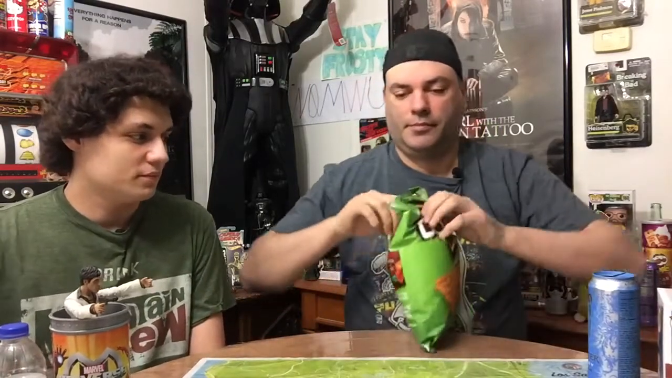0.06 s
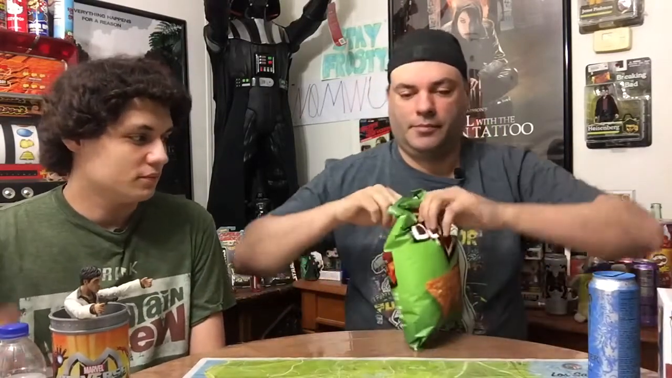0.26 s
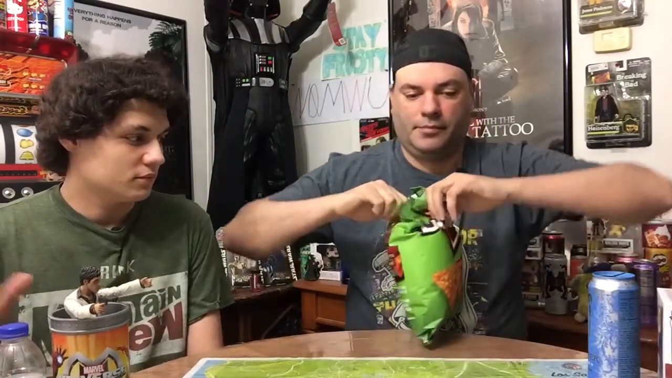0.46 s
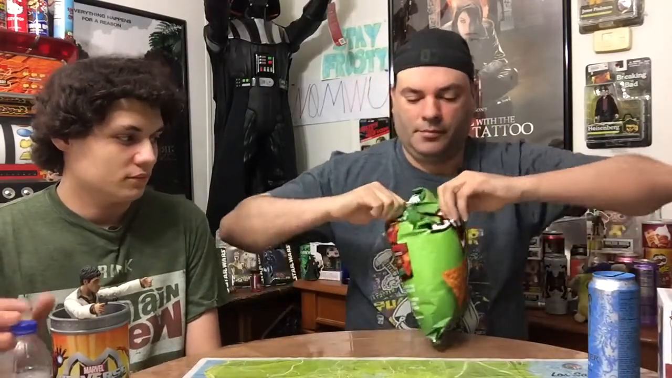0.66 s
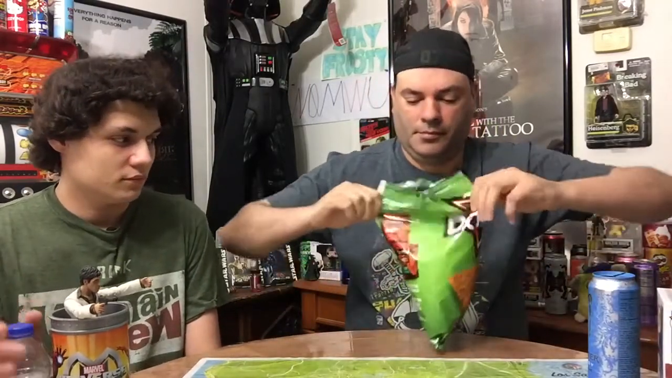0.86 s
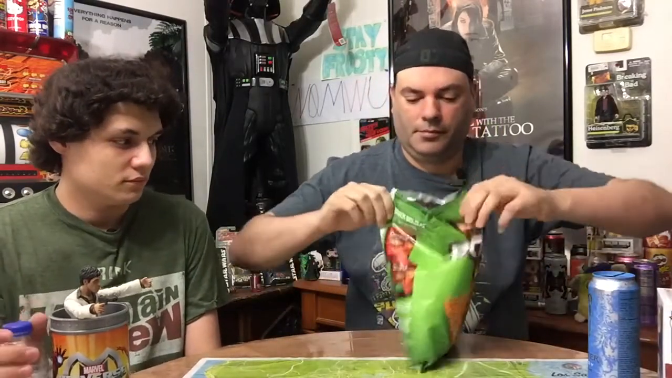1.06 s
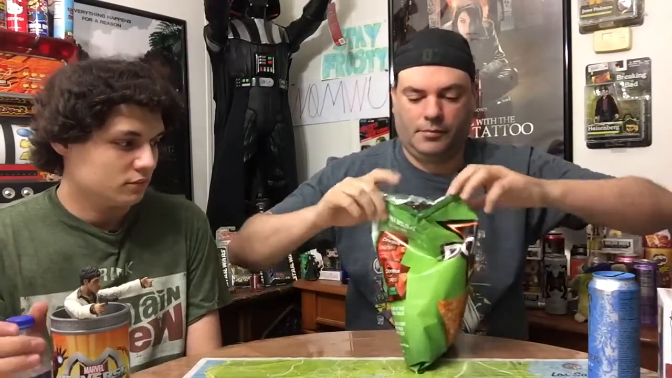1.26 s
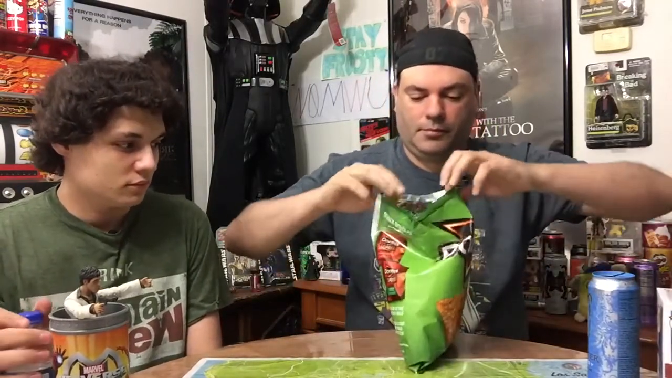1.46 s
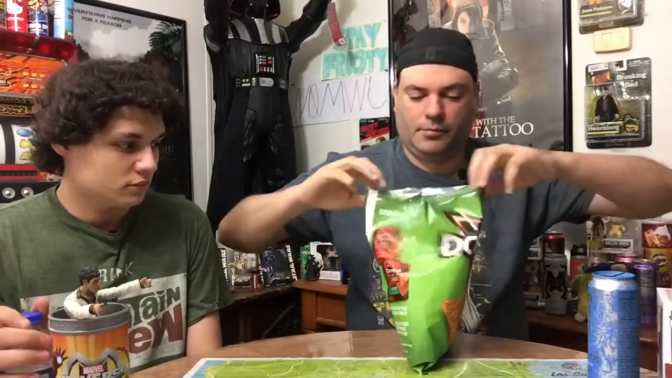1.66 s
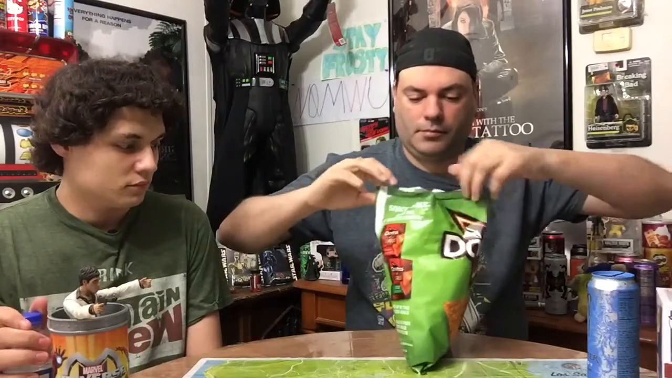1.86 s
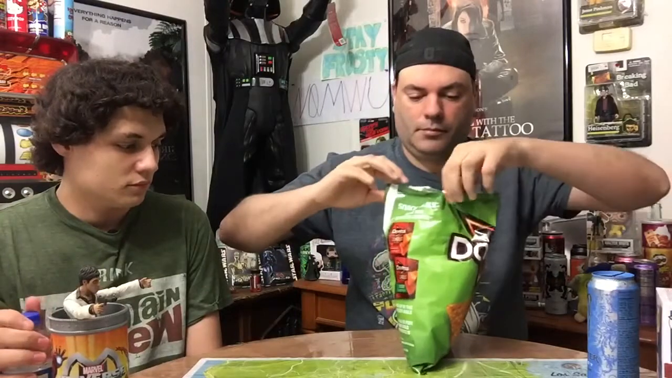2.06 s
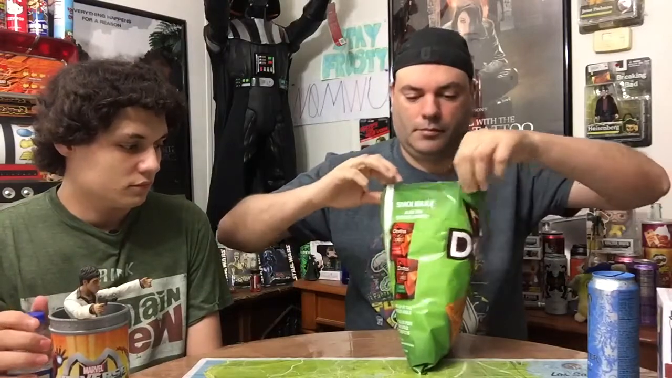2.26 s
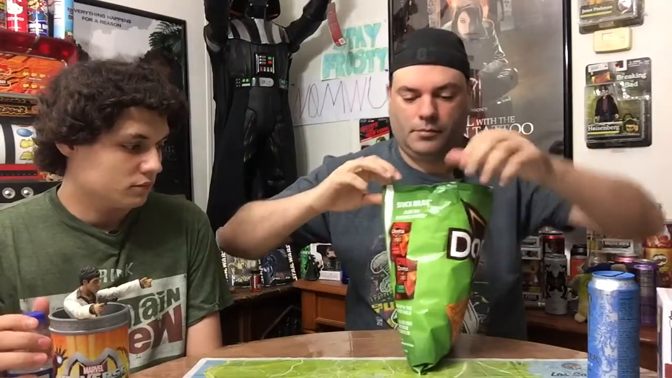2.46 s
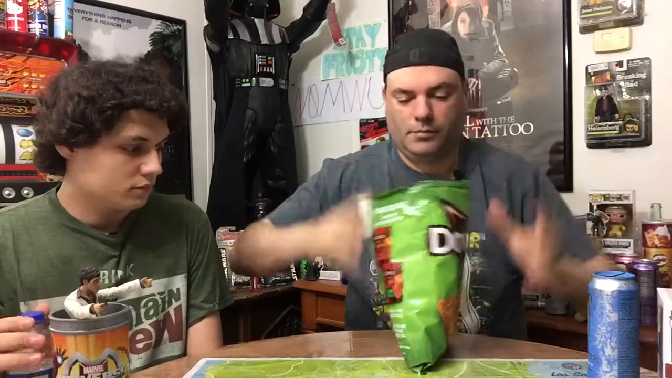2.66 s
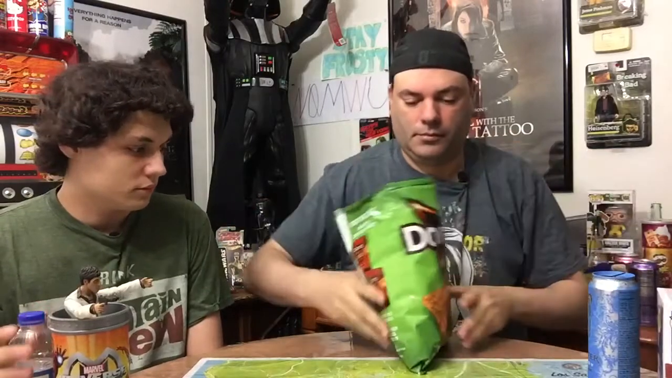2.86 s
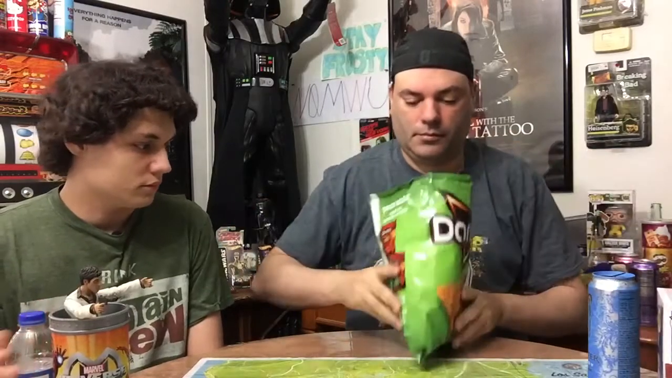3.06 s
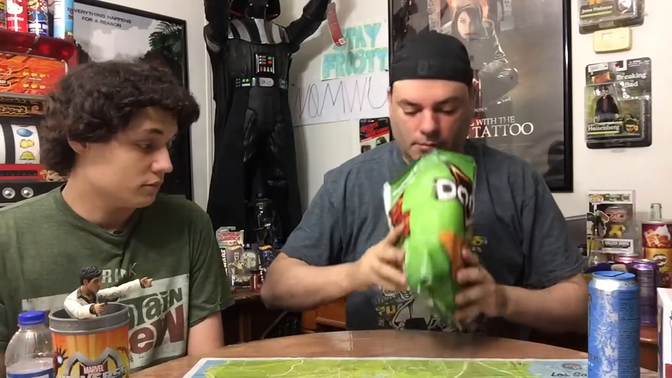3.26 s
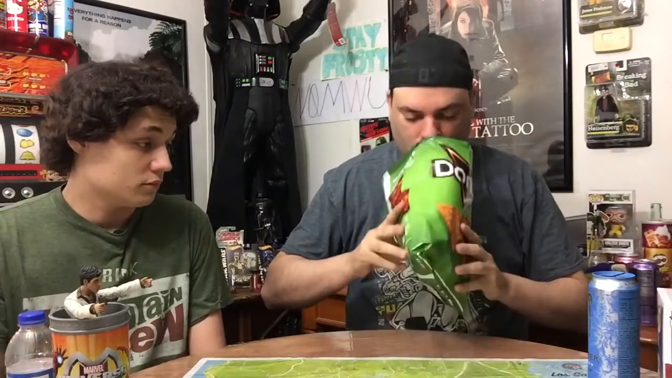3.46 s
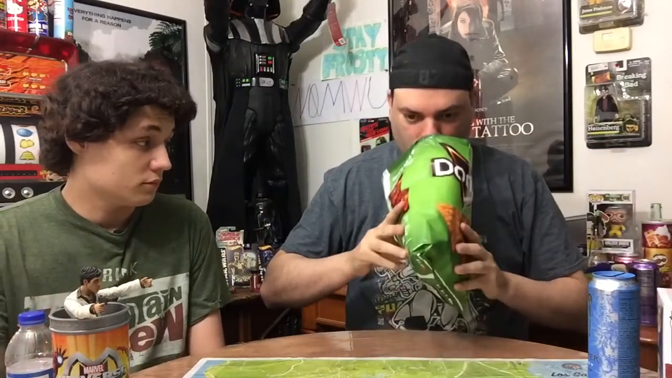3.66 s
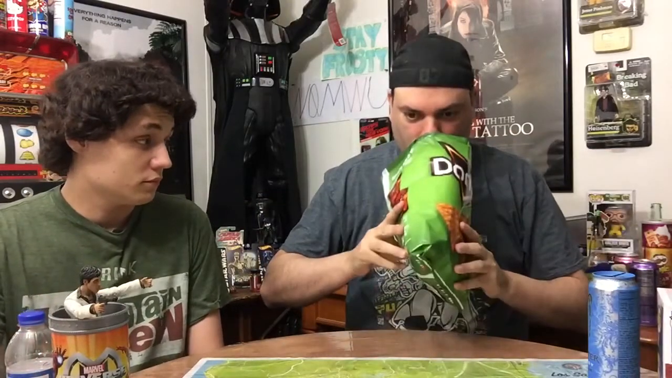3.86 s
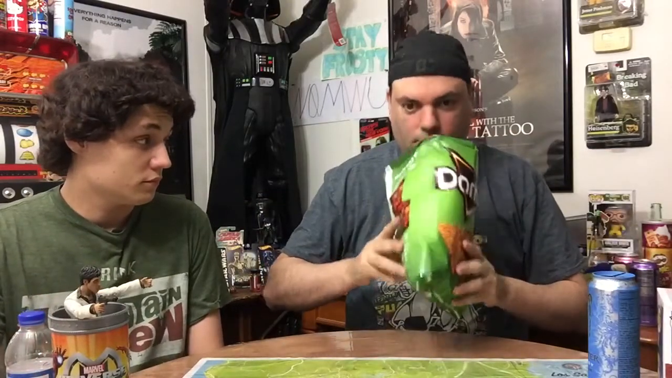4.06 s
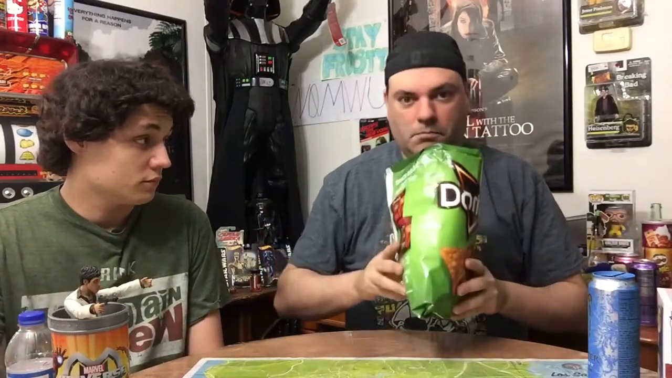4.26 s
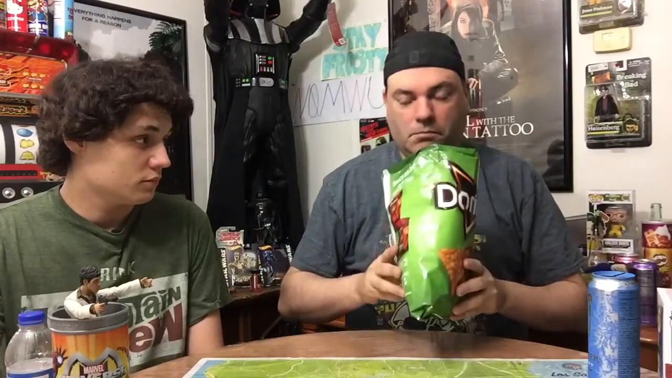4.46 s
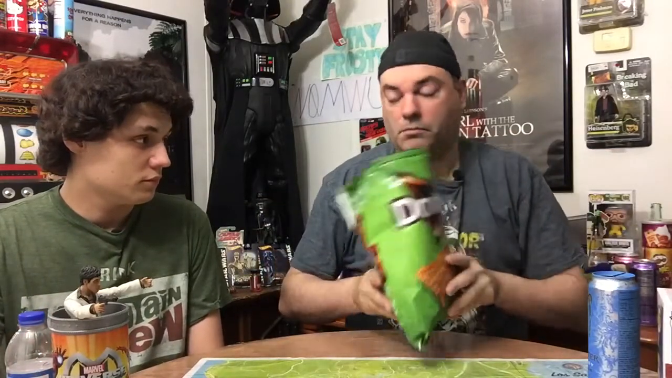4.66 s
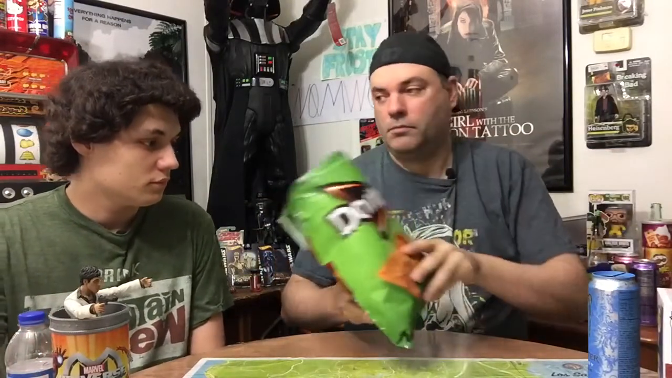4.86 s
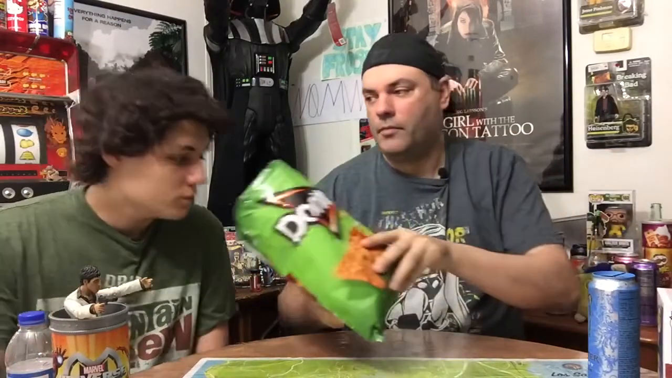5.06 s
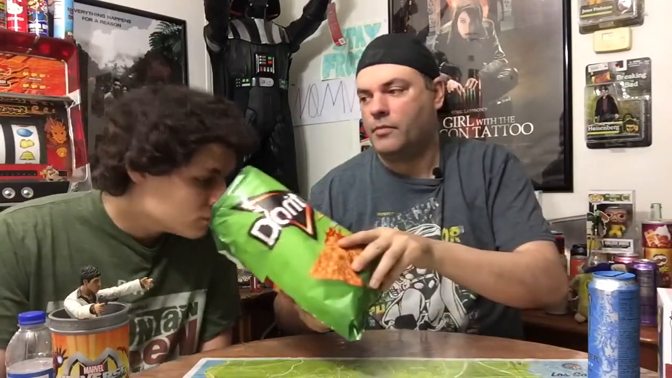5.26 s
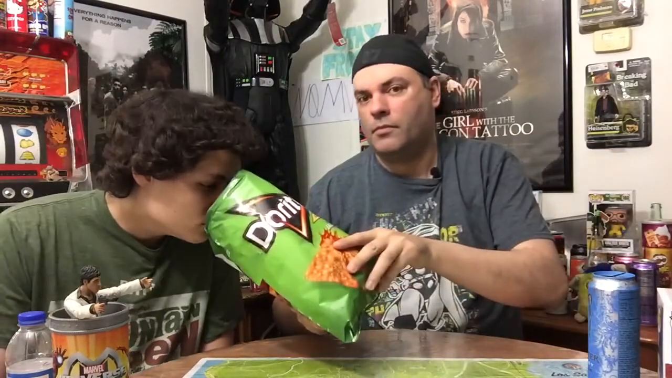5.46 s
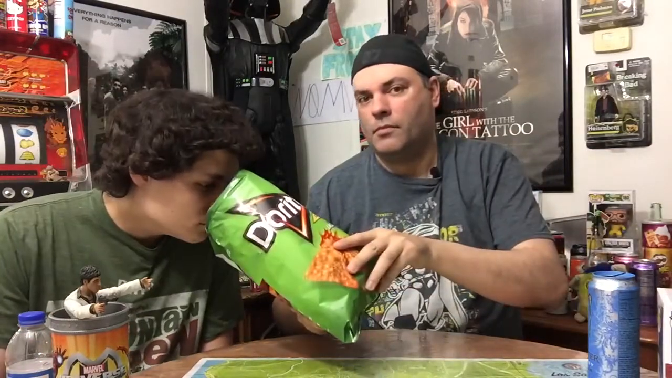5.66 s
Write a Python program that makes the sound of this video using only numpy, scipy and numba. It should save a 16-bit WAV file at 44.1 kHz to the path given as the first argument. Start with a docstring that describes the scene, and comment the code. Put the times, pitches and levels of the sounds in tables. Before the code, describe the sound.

Bright, snappy foil packet crackling with a brief seal rip near the start, dying to occasional soft ticks in a small quiet room.

```python
"""A foil snack bag is pulled open and handled at a table, a metre or two from the microphone.
Creases buckle in a random crackle that follows the squeezes; louder ones also ring a flat panel of the bag.
The glued seal gives two tugs and tears, as noisy stick-slip pulses through broad resonances.
The small furnished room adds one early reflection and a faint tail. Behind it two motors hum and beat,
a low throb comes and goes, drones waver, and a thin whine sits over the steady room hiss."""
import sys
import numpy as np
from scipy import signal
from scipy.fft import rfft, irfft
from scipy.io import wavfile
from numba import njit

SR = 44100
rng = np.random.default_rng(int(sys.argv[2]) if len(sys.argv) > 2 else 0)


def wav_out(sig):
    """Save sig, one row per channel (or a flat mono array), as 16-bit PCM at SR to the path in sys.argv[1]."""
    wavfile.write(sys.argv[1], SR, np.round(np.clip(np.atleast_2d(sig).T, -1, 1) * 32767).astype(np.int16))


N = 252328  # length [samples]

# squeezes of the bag: (grip reached [s], held [s], crackle level [dB], let-go rate [dB/s])
SQUEEZES = [(0, 0.036, -35, 71), (0.202, .17, -40.5, 124), (.505, 0.21, -37, 82), (.68, 0.12, -40, 298.5),
            (0.812, 0.095, -27.5, 300), (0.986, 0.0053, -32, 111), (1.175, 0.02, -27, 698),
            (1.3, 0.0084, -41.5, 550), (1.433, 0.26, -49, 300), (1.657, 0.14, -34.5, 129),
            (2.209, 0.011, -40.5, 699), (2.292, 0.082, -37, 255), (2.421, 0.069, -48.5, 800),
            (2.62, 0.051, -60, 650.5), (2.813, 0.0048, -40.5, 408), (2.875, 0.035, -37.5, 211),
            (3.038, 0.03, -40, 350), (3.141, 0.014, -48.5, 301), (3.208, 0.09, -50, 221),
            (4.173, 0.015, -47, 256.5), (4.642, 0.047, -54, 102), (4.862, 0.059, -54.5, 208),
            (5.044, 0.015, -53.5, 502)]
# how the grip colours the crackle: (time [s], bag boom [dB], sizzle [dB])
GRIP_COLOUR = [(0, -2.5, -17.5), (.6, -5, -6.5), (1.501, -7.5, -10), (2.302, -2.5, -3.5), (3.003, 0.5, -15),
               (4.201, -3.5, -27), (4.698, 5, -20), (4.851, -3.5, -2.5), (5.101, 8.5, -22)]
# single loud creases: (time [s], snap level [dB], panel pitch [Hz], sizzle [dB])
LOUD_SNAPS = [(.0117, -36, 3200, -30), (.0352, -24, 6500, -8), (.052, -8.5, 627, -28),
              (.0793, -16.5, 3330, -16), (.129, -26.5, 400, 0), (.2768, -23, 2540, -20),
              (.2958, -24, 2250, -3), (.3372, -8.5, 3300, -15.5), (.4283, -16, 1900, -16.5),
              (.449, -23.5, 493, -12), (.5381, -20, 2740, -31), (.5833, -18.5, 3170, -18),
              (.604, -24, 4700, -11), (.6135, -8, 2330, -22), (.623, -14.5, 2270, -12),
              (.6392, -11.5, 3570, -28), (.6906, -22, 3570, 0), (.8512, -13, 2640, -24),
              (.862, -31, 2510, -30), (.8704, -7, 3200, -30), (.895, -12.5, 1060, 3),
              (.919, -15.5, 400, -11), (.9742, -26.5, 3180, 4.5), (1.061, -21.5, 3150, -33.5),
              (1.1863, -18, 1330, -18), (1.3928, -26.5, 2730, -25), (1.4282, -33, 2750, 3.5),
              (1.4565, -24, 2260, -15), (1.5232, -32.5, 2500, 6.5), (1.6318, -23, 3300, -11),
              (1.6606, -14, 2200, -8.5), (1.7285, -17, 3630, -16.5), (1.7682, -10, 2480, -13),
              (1.7919, -10, 910, -3), (1.8, -5.5, 2550, -18), (2.011, -33.5, 2250, -8),
              (2.148, -42.5, 1800, -29), (2.2042, -24, 2410, -24), (2.2875, -16.5, 1930, -3),
              (2.3025, -19, 2000, -20), (2.346, -18, 2430, -22), (2.3565, -29, 2200, -17),
              (2.363, -7.5, 2150, -25.5), (2.3872, -14.5, 840, -36), (2.3945, -13.5, 3080, -22),
              (2.468, -17.5, 2600, -41), (2.5136, -30, 816, -1), (2.5686, -26.5, 2520, -33),
              (2.6195, -34.5, 2940, -6), (2.7869, -31, 613, -26), (2.817, -18, 2920, -17),
              (2.8726, -31.5, 580, 13), (2.9108, -37, 288, -15), (2.947, -21, 3550, -31),
              (3.056, -28, 620, -5), (3.083, -19, 1360, -32), (3.165, -37.5, 1147, -7),
              (3.239, -36.5, 480, 4), (3.2844, -38.5, 570, 1), (3.486, -45.5, 1840, -34),
              (3.75, -26, 733, 1.5), (3.8563, -32.5, 2690, -12.5), (3.8736, -42.5, 1450, -4),
              (3.9976, -30, 696, -43.5), (4.1663, -35, 1976, -35.5), (4.1954, -33, 669, -9.5),
              (4.3226, -32, 1147, -15.5), (4.5516, -36.5, 1090, -27), (4.6615, -30.5, 794, -38),
              (4.702, -32, 796, -38), (4.7572, -29, 1400, -6.5), (4.778, -25.5, 6100, -22),
              (4.7917, -27.5, 2640, 1.5), (4.8746, -28, 1300, -20), (4.9152, -25, 606, -7.5),
              (4.917, -38, 229, -26), (5.0485, -39.5, 673, -26), (5.063, -36.5, 704, -33.5),
              (5.249, -52, 1287, -28.5)]
# colour of a crease, before grip and patch: (frequency [Hz], relative level [dB])
FOIL_MODES = [(172, -18.5), (318, -10.5), (452, -7.5), (709, 1), (1110, 3), (1760, -0.5), (2545, 1),
              (3700, 1), (5550, 2.5), (7550, 2.5), (10800, 1.5), (13600, 4)]
# the seal, two tugs and the tear: (start [s], end [s], start level [dB], end level [dB], slip rate [1/s])
SEAL_TEARS = [(0.721, 0.761, -30, -27, 430), (.776, 0.785, -23.5, -27, 1100),
              (0.801, 0.809, -15, -10.5, 2500)]
# resonances of the tearing seal: (centre [Hz], width [Hz], relative level [dB])
RIP_BANDS = [(3140, 670, -0.5), (5900, 2300, 4.5), (9000, 1900, -2.5), (12330, 12000, 3)]
# diffuse tail at the microphone: (centre [Hz], 60 dB decay [s], level against the direct sound [dB])
ROOM_TAIL = [(300, .25, -22), (1200, .2, -21), (4000, .25, -17), (11000, .18, -17)]
# two motors almost in tune: (frequency [Hz], rms level [dB])
MOTORS = [(58.85, -67), (59.52, -70)]
# low tone that comes and goes: (time [s], rms level [dB])
THROB_LEVEL = [(0, -64), (1.2, -66.5), (1.6, -79.5), (5.1, -70), (5.38, -63), (5.72, -67.5)]
# wavering drones: (centre [Hz], width [Hz], rms level [dB])
DRONES = [(114, 12, -79), (420, 60, -83)]
# spectrum of the room hiss: (frequency [Hz], relative level per hertz [dB])
HISS_SPECTRUM = [(82, -25.5), (140, -4.5), (297, -4.5), (408, 0), (488, -9), (2630, -11.5), (16000, -23.5)]

CRACKS_PER_S = 1200
SQUEEZE_DB_PER_S = 901  # how fast the crackle builds as the fingers close
SETTLE_DB = -82  # the bag creeps faintly between squeezes
BOOM_BELOW_HZ, SIZZLE_ABOVE_HZ = 3610, 1990  # boom and sizzle act more with octaves beyond these, to a limit
PANEL_DB, PANEL_SHARE = 2, 0.83  # panel ring over a -25 dB snap; it grows by this share of each further dB
CREASE_DB = -5.5  # the broad snap under the panel ring
BOOM_DB, BOOM_DB_PER_OCTAVE = -12.5, 2  # bag boom of a 1 kHz panel; larger, lower panels boom more
TEAR_RISE_DB_PER_S, TEAR_FALL_DB_PER_S = 1800.5, 4999.5
WALL_S, WALL_DB = 0.0074, -16.5  # delay and level of one early reflection
IN_STEP_S = .7  # moment at which both motors push together
THROB_HZ = 77
WHINE_HZ, WHINE_DB = 3970, -79
HISS_DB = -71.5  # rms
TOP_HZ = 15900  # upper limit of the recorder


def crackle():
    """A random rain of small creases, mostly faint, a few strong, on patches of every size."""
    when, size, patch = rng.random((int(CRACKS_PER_S * N / SR), 3)).T
    when = when * N / SR
    # the crackle comes in loose clumps, swelling and thinning at random
    clumps = level(band(rng.standard_normal(N), 40, 60), 0)
    size_db = np.minimum(-3.5 * np.log(1 - size), 11)
    size_db = size_db + 2 * clumps[(when * SR).astype(int)]

    grip_s, grip_boom_db, grip_sizzle_db = np.transpose(GRIP_COLOUR)
    boom_db = np.interp(when, grip_s, grip_boom_db)
    sizzle_db = np.interp(when, grip_s, grip_sizzle_db)
    patch_hz = 160 * 2 ** (6.4 * patch)
    crack_db = handling_db(when) + size_db
    return creases(when, crack_db, boom_db, sizzle_db, patch_hz, focus_db=7, smear_cycles=16.0)


def handling_db(t):
    """Crackle level: every squeeze builds, holds and dies away; they add in power."""
    reached, held, db, fall = np.transpose(SQUEEZES)[:, :, None]
    building = SQUEEZE_DB_PER_S * np.maximum(reached - t, 0)
    letting_go = fall * np.maximum(t - reached - held, 0)
    squeeze_power = undb(2 * (db - building - letting_go))
    return 10 * np.log10(np.sum(squeeze_power, axis=0) + undb(2 * SETTLE_DB))


def snaps(count=3):
    """Each loud crease rings the flat panel beside it, among weaker buckles a few milliseconds after."""
    s, db, panel_hz, sizzle_db = np.repeat(LOUD_SNAPS, count, axis=0).T
    late, faint, tune = rng.random((len(s), 3)).T
    follower = np.arange(len(s)) % count > 0
    panel_db = PANEL_DB - (1 - PANEL_SHARE) * (db + 25)
    boom_db = BOOM_DB - BOOM_DB_PER_OCTAVE * np.log2(panel_hz / 1000)
    s = s + follower * (0.011 * late + .001)
    db = db - follower * (11 + 8 * faint)

    start = (s * SR).astype(np.int64)
    ring_hz = panel_hz * 0.95 ** (follower * (tune - .5))
    cycles = 5 * np.minimum(panel_hz / 1000, 1) ** .4  # big low panels ring for fewer cycles
    panel = ring(N, start, ring_hz, cycles, undb(db + panel_db), 1. * SR)
    return panel + creases(s, db + CREASE_DB, boom_db, sizzle_db, panel_hz, focus_db=0.5, smear_cycles=5.0)


def creases(s, db, boom_db, sizzle_db, patch_hz, focus_db, smear_cycles):
    """Every crease rings detuned short modes, strongest near its patch pitch (focus_db: loss per octave off)."""
    hz, foil_db = np.repeat(FOIL_MODES, 2, axis=0).T  # a pair of modes for each row
    cycles = np.clip(hz / 192.0, 5, 24)
    boom = np.clip(.4 * np.log2(BOOM_BELOW_HZ / hz), 0, .7)
    sizzle = np.clip(0.35 * np.log2(hz / SIZZLE_ABOVE_HZ), .1, 1)
    tune, sign, late, loud = rng.random((len(s), len(hz), 4)).transpose(2, 0, 1)
    pitch = np.minimum(hz * 1.471 ** (tune - .5), .4 * SR)

    octaves_off = np.abs(np.log2(pitch / patch_hz[:, None]))
    mode_db = db[:, None] + foil_db + boom * boom_db[:, None] + sizzle * sizzle_db[:, None]
    mode_db = mode_db + 3.0 * (2 * loud - 1) - focus_db * octaves_off
    size = undb(mode_db) * np.sign(sign - .5)
    # modes start at scattered moments, the highest treble soonest
    delay = late * np.minimum(smear_cycles / pitch, .0015)
    start = ((s[:, None] + delay) * SR).astype(np.int64)
    cycles = np.broadcast_to(cycles, pitch.shape)
    rung = ring(N, start.ravel(), pitch.ravel(), cycles.ravel(), size.ravel(), 1. * SR)
    # a light sheet cannot radiate deep bass
    return signal.sosfilt(signal.butter(4, 110, "high", fs=SR, output="sos"), rung)


@njit
def ring(count, start, hz, cycles, size, sr):
    """Damped sines that swell over their first cycle and fall 60 dB in twice their number of cycles."""
    out = np.zeros(count)
    for k in range(len(start)):
        length = int(2 * cycles[k] * sr / hz[k])
        turn = np.exp(2j * np.pi * hz[k] / sr - np.log(1000.) / length)
        z = size[k] + 0j
        unborn = 1.
        rise = np.exp(-2 * hz[k] / sr)
        for i in range(start[k], min(start[k] + length, count)):
            out[i] += z.imag * (1 - unborn)
            z *= turn
            unborn *= rise
    return out


def rip():
    """The glued seam peels in stick-slip jerks, a buzz when slow and a rough hiss when fast."""
    t = np.arange(N) / SR
    out = 0
    for t0, t1, db0, db1, rate in SEAL_TEARS:
        # one jerk of random size each time the unsteady phase passes a whole number
        phase = rate * t + .1 * level(band(rng.standard_normal(N), rate / 4, rate / 2), 0)
        jerks = (np.diff(np.floor(phase), prepend=0) > 0) * (.5 + rng.random(N))
        slips = jerks + 0.082 * rng.standard_normal(N)
        hiss = sum(level(band(band(slips, hz, w), hz, w), db) for hz, w, db in RIP_BANDS)
        before_db = TEAR_RISE_DB_PER_S * np.maximum(t0 - t, 0)
        after_db = TEAR_FALL_DB_PER_S * np.maximum(t - t1, 0)
        tear_db = np.interp(t, (t0, t1), (db0, db1)) - (before_db + after_db)
        out = out + level(hiss, 0) * undb(tear_db)
    return out


def room(x):
    """One early reflection and a faint diffuse tail that dies sooner in the upper treble."""
    t = np.arange(SR // 2) / SR
    response = 0
    for hz, t60, db in ROOM_TAIL:
        decay = 1000. ** (-t / t60)
        build = np.minimum(t / .006, 1)
        part = band(rng.standard_normal(len(t)), hz, hz * 1.5) * decay * build
        response = response + undb(db) * part / np.sqrt(np.sum(part ** 2))
    response[0] = 1  # direct sound
    response[int(WALL_S * SR)] += undb(WALL_DB)
    return signal.fftconvolve(x, response)[:N]


def background():
    """Two motors almost in tune swell and cancel; a throb, wavering drones, a thin whine and a steady hiss."""
    t = np.arange(N) / SR
    hum = sum(np.sqrt(2) * undb(db) * np.sin(2 * np.pi * hz * (t - IN_STEP_S)) for hz, db in MOTORS)
    throb_db = np.interp(t, *np.transpose(THROB_LEVEL))
    throb = np.sqrt(2) * undb(throb_db) * np.sin(2 * np.pi * THROB_HZ * t)
    drones = sum(level(band(band(rng.standard_normal(N), hz, w), hz, w), db) for hz, w, db in DRONES)
    drift = level(band(rng.standard_normal(N), 7.3, 9.1), 0)
    whine_hz = WHINE_HZ + 12 * drift
    whine = np.sqrt(2) * undb(WHINE_DB) * np.sin(2 * np.pi * np.cumsum(whine_hz) / SR)
    hiss = level(coloured(HISS_SPECTRUM, count=N), HISS_DB)
    return hum + throb + drones + whine + hiss


def coloured(points, count):
    """Noise shaped to a (frequency [Hz], level [dB]) spectrum."""
    hz, db = np.transpose(points)
    f = np.maximum(np.fft.rfftfreq(count, 1 / SR), 1)
    gain = undb(np.interp(np.log(f), np.log(hz), db))
    return irfft(rfft(rng.standard_normal(count)) * gain, count)


def band(x, hz, width):
    """Two-pole resonance, gain 1 at the centre."""
    return signal.lfilter(*signal.iirpeak(hz, hz / width, fs=SR), x)


def level(x, db):
    """Scale to an rms level."""
    return x * undb(db) / np.sqrt(np.mean(x ** 2))


def undb(db):
    """Decibels to gain."""
    return 10 ** (np.asarray(db) / 20)


def scene():
    """The bag in the room over the background, at one microphone."""
    bag = crackle() + snaps() + rip()
    return (room(bag) + background())[None]


def record(dry):
    """The recorder cuts the top steeply, with the same low-pass twice."""
    cut = signal.ellip(10, .1, 50, TOP_HZ, fs=SR, output="sos")
    return signal.sosfilt(cut, signal.sosfilt(cut, dry))


dry = scene()
out = record(dry)
wav_out(out)
```